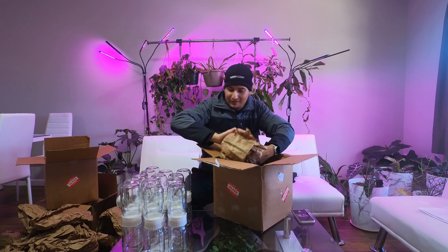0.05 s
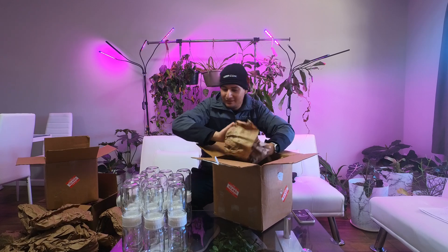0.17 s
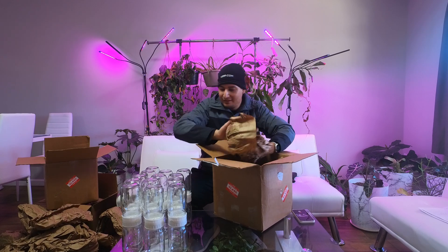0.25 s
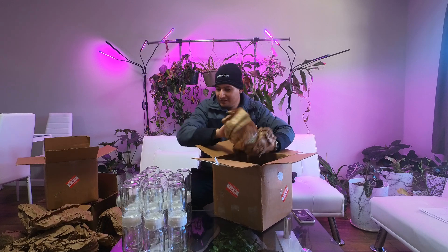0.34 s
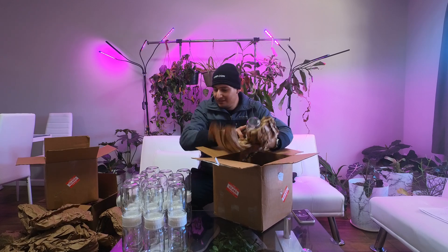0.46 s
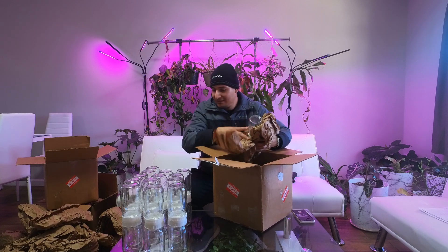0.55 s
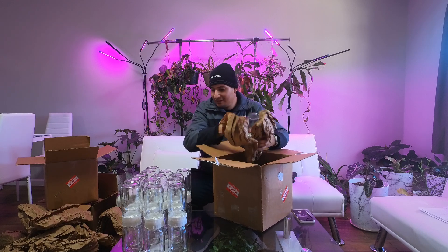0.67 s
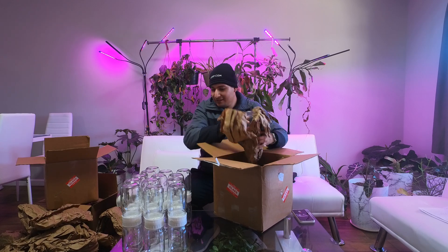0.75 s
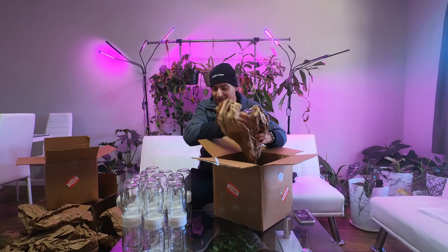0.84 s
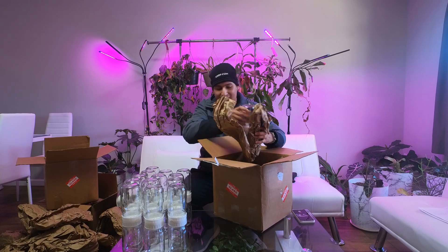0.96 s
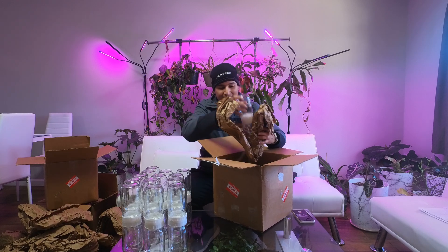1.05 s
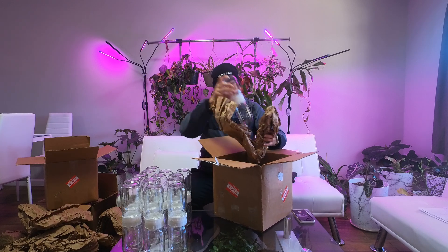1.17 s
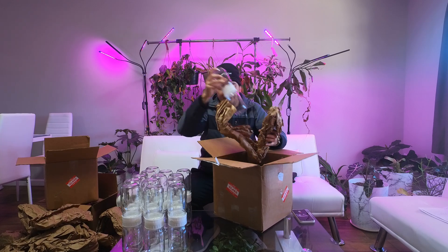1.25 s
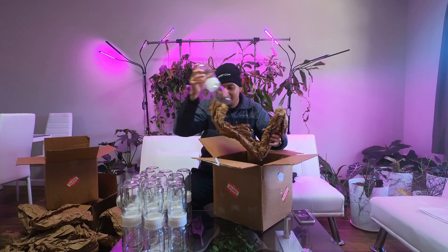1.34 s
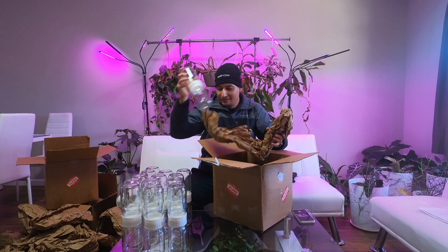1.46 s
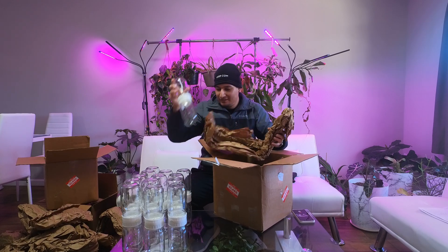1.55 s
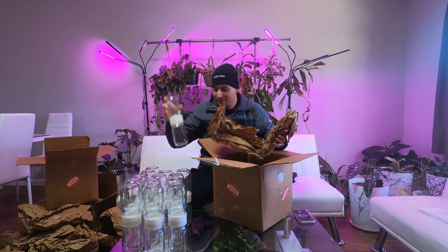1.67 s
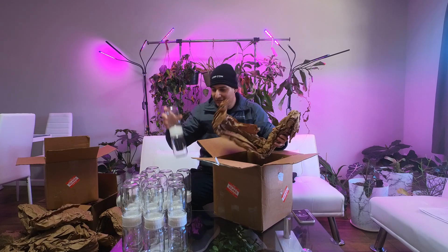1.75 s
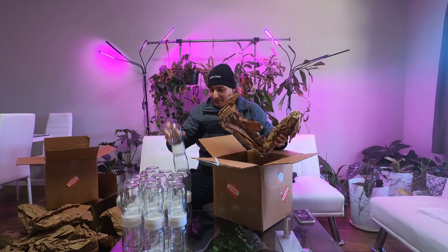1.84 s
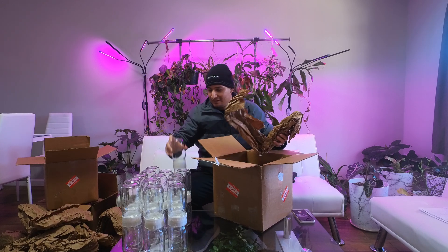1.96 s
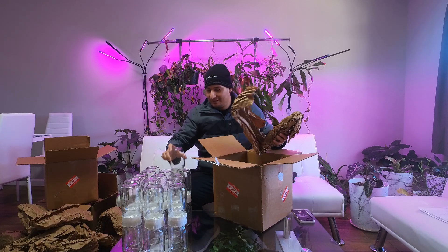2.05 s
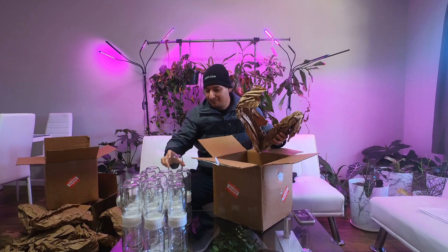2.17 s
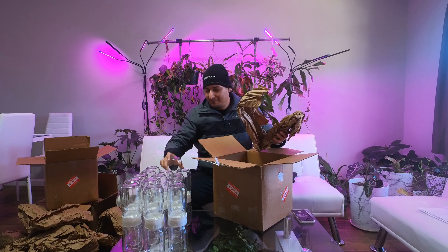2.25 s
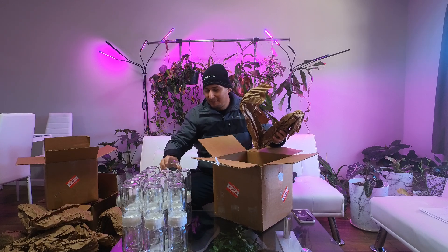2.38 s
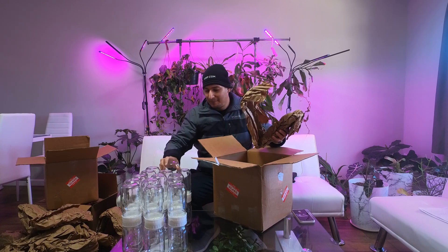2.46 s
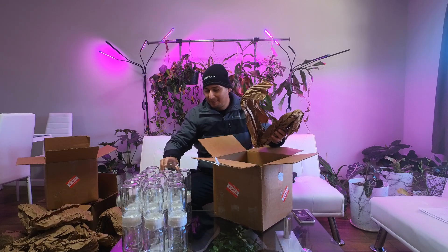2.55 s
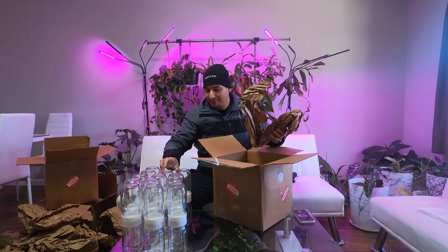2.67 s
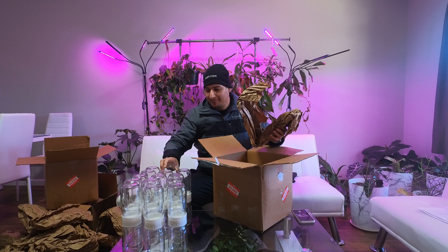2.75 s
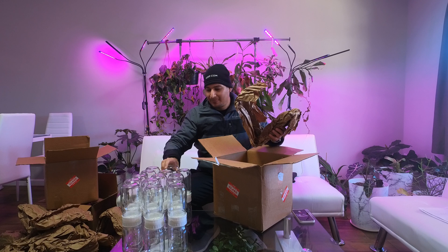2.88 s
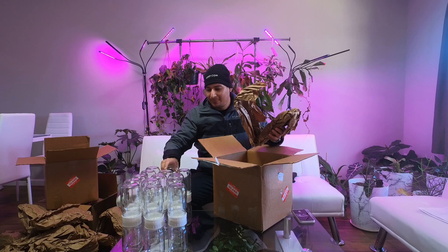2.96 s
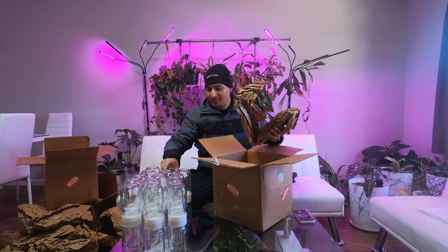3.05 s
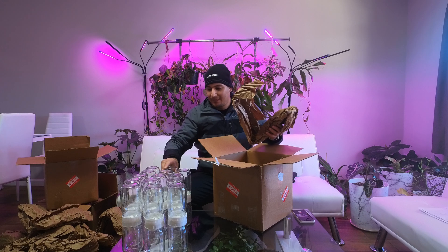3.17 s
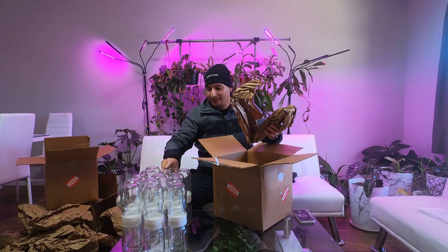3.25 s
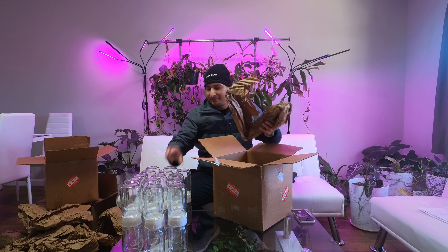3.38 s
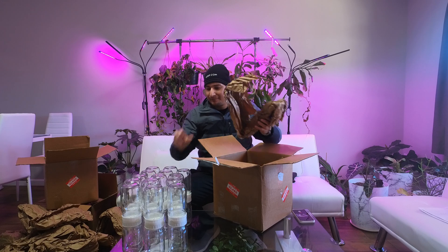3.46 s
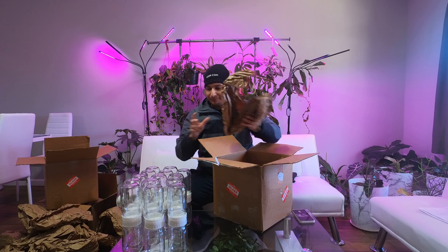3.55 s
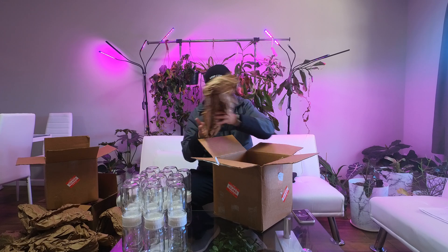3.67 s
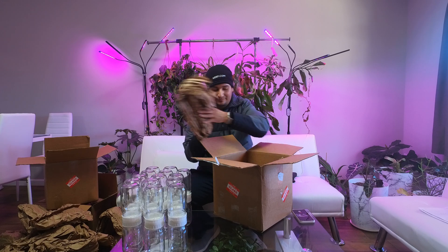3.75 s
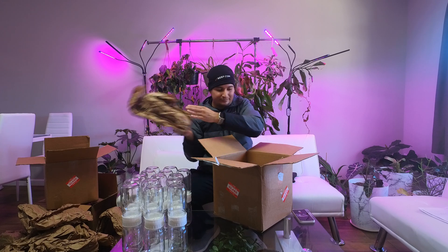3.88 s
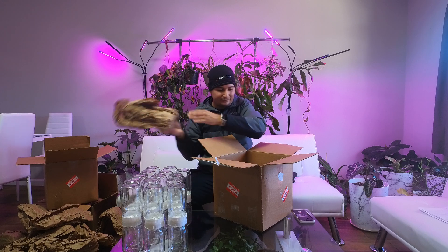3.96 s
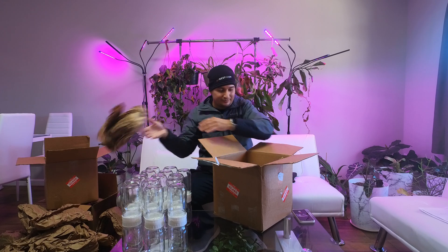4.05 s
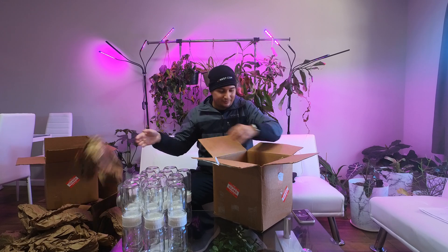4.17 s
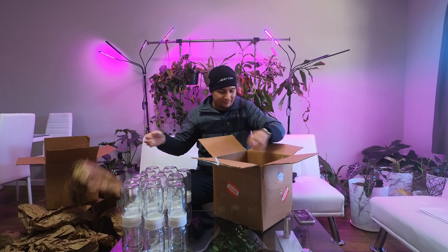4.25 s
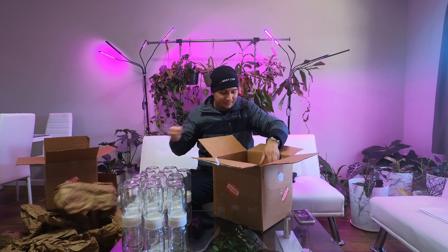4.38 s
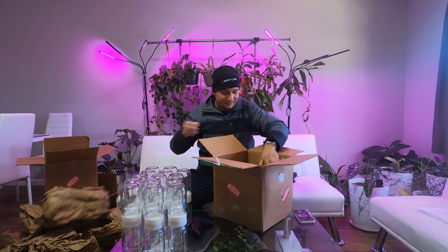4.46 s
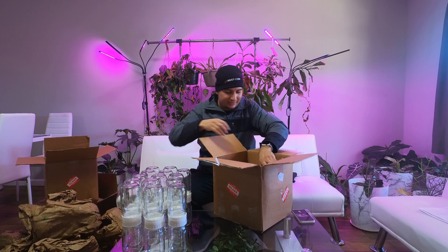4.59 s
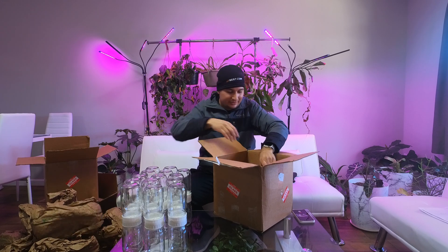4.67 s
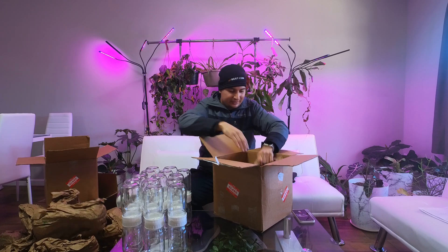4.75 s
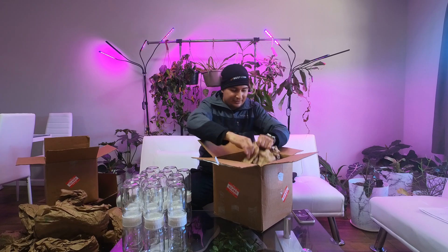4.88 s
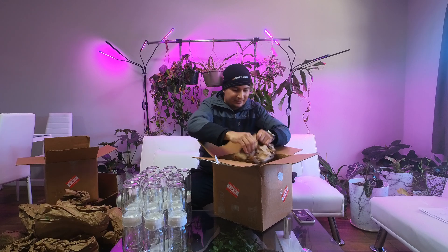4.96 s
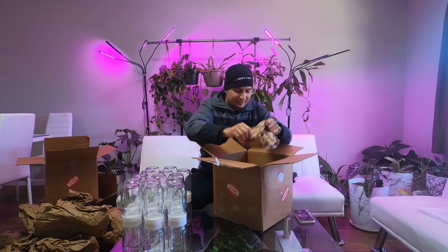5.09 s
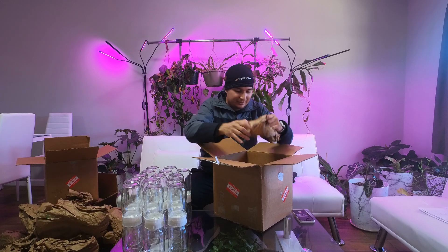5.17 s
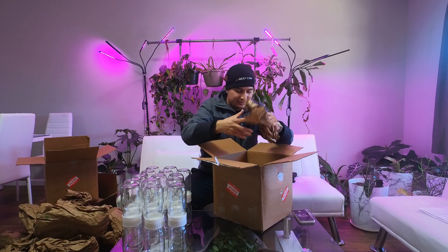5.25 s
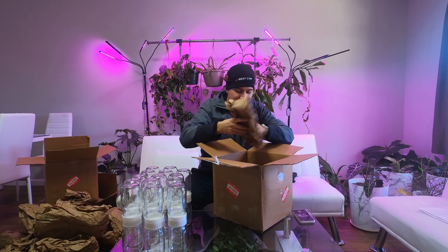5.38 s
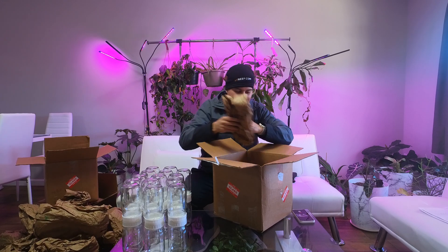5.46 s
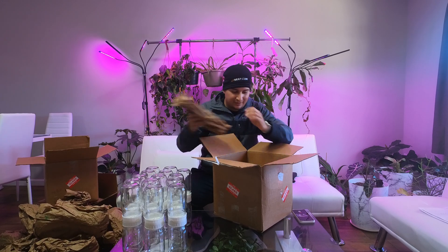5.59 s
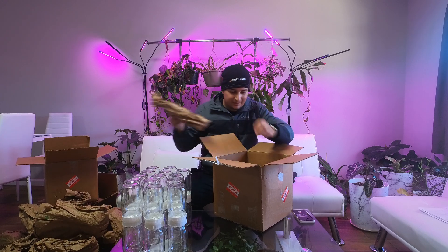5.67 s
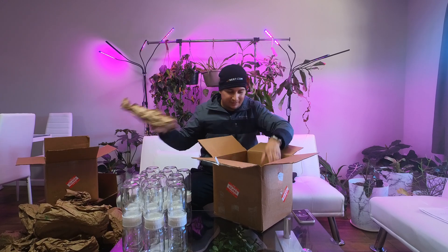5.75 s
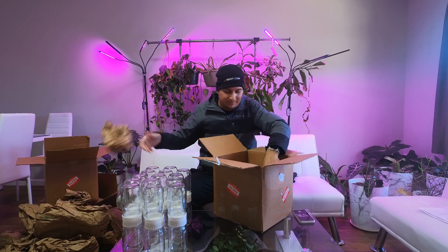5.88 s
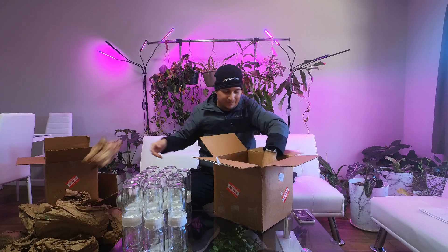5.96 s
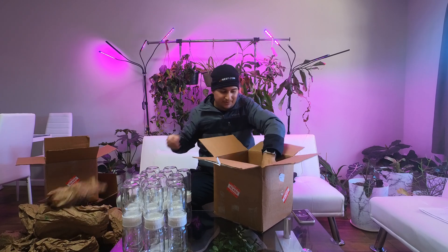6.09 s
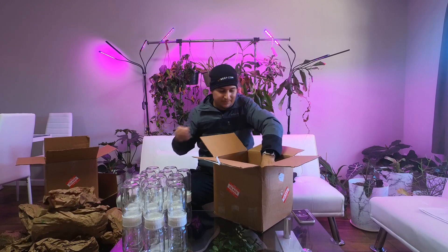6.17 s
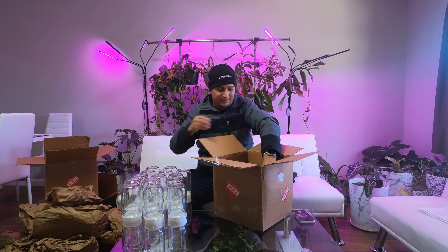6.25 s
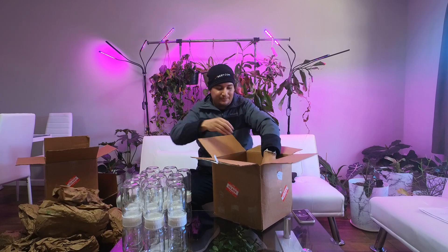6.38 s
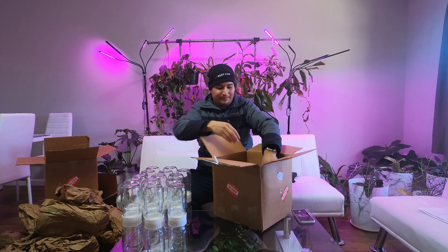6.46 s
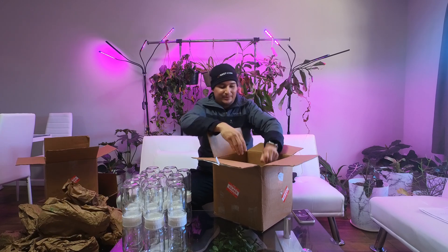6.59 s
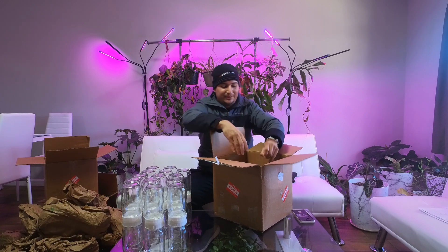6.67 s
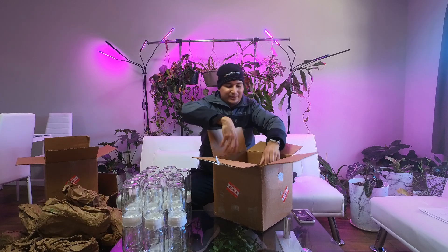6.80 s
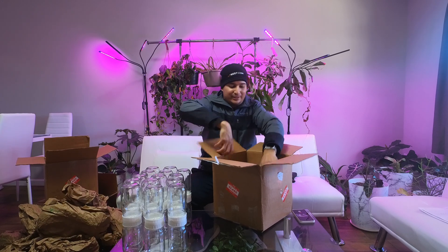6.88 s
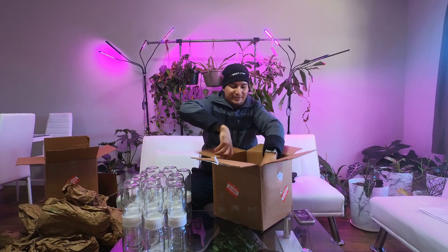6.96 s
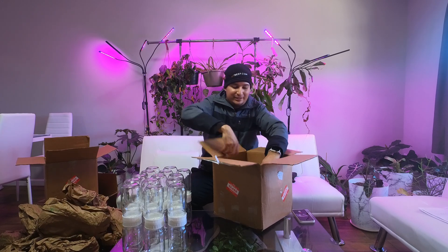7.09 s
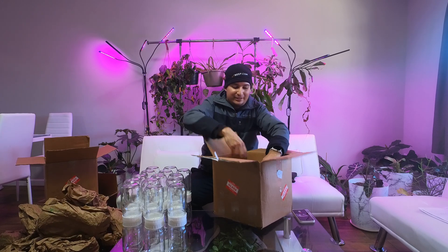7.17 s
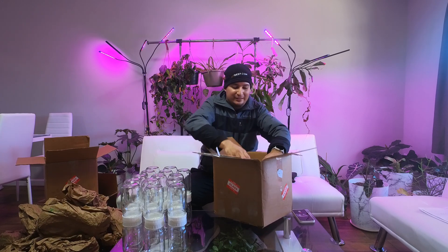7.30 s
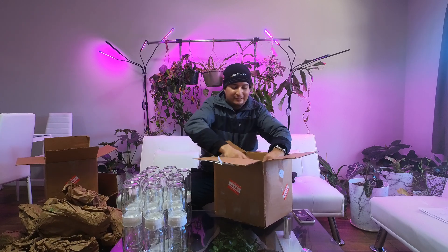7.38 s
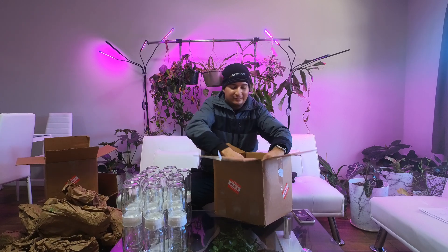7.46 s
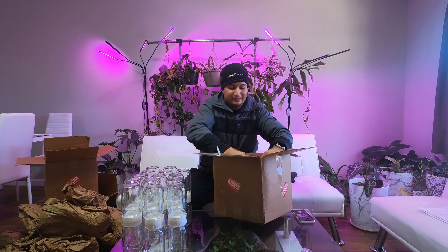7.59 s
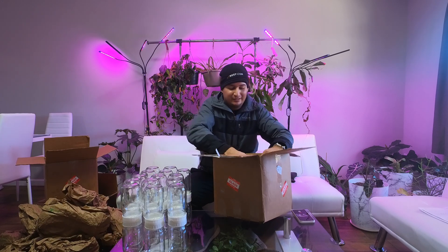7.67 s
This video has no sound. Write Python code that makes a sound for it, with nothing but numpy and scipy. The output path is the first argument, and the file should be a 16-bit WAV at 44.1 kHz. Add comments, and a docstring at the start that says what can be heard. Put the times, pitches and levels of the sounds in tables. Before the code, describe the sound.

Stereo pickup at a few metres in a hard room. Crisp paper snaps and crackles fade to near silence; a jar ticks against other glass and meets the table with a short knocking rattle. The paper is then crumpled and tossed away, and hands rummage in the box, with drier rustles, low boxy thumps, a brief flap groan and a faint low shifting rumble.

```python
"""Bare room, two microphone ports a few metres away: stiff packing paper is crumpled and pulled from a cardboard box.
Paper: swarms of random clicks through crease spectra, plus pitched bursts for large folds.
Box: low-pitched click swarms, decaying panel modes, a humming flap and swells of low rumble.
Glass: a jar touches its neighbours and is set on a glass table; noise bursts and decaying modes.
Each handled sound reaches the ports through a short wash of room echoes, over faint room tone."""
import sys
import numpy as np
from scipy import signal
from scipy.fft import rfft, irfft, next_fast_len
from scipy.io import wavfile
from scipy.ndimage import uniform_filter1d

SR = 44100
rng = np.random.default_rng(int(sys.argv[2]) if len(sys.argv) > 2 else 0)


def persist_wave(psi):
    """Save psi, clipped to +-1, as 16-bit WAV."""
    counts = np.round(np.clip(psi, -1, 1) * 32767).astype(np.int16)
    wavfile.write(sys.argv[1], SR, np.atleast_2d(counts).T)


N = 340893

# room tone spectrum, relative: freq_hz, level_db
AIR_SPECTRUM = [(20, -27.5), (50, -23), (76, -11), (145, -5), (223, -2), (330, -9), (545, -19.5),
                (1000, -26.5), (2000, -31), (5000, -41), (9500, -46.5), (12000, -33.5), (16000, -65)]
# spectrum of jar chatter, relative: freq_hz, level_db
CLINK_SPECTRUM = [(650, -63), (1100, -47), (1330, -5), (1750, 1), (2250, -7), (2600, 3), (3050, -12),
                  (3400, -11), (4630, -15), (8000, -56), (10400, -68), (17600, -120)]
# spectrum of the set-down blow, relative: freq_hz, level_db
THUD_SPECTRUM = [(35, -44), (65, -13), (110, -23), (192, -0.5), (372, -4), (640, -8), (860, -2), (1080, -7),
                 (1280, -8), (1900, -12), (2300, -7), (2800, -14), (3720, -14), (4500, -27), (6020, -46),
                 (12500, -64), (14000, -60)]
# jar modes, relative: freq_hz, level_db, t60_s
JAR_MODES = [(1750, -2, 0.1), (1790, -8, .1), (2480, -1, .07), (2630, -6, 0.17), (3320, -16, 0.06),
             (1450, -9, 0.15)]
# glass table modes, relative: freq_hz, level_db, t60_s
TABLE_MODES = [(365, -6, .25), (504, -9, .19), (845, -9, .55), (890, -9, .4), (1040, -5, .08),
               (2290, -3, .12), (3740, -10, .1)]
# jar against jar: start_s, level_db, chatter_t60_s, rise_s
TOUCHES = [(2.8206, -44.5, 0.07, 0.0001), (2.861, -52, 0.06, 0.0002), (3.316, -48, 0.4, 0.012)]
# jar meets the table and rocks flat: start_s, level_db
SET_DOWNS = [(3.039, -22.5), (3.061, -29), (3.092, -32)]
# blows on the box: start_s, level_db, pitch_hz, t60_s
KNOCKS = [(.796, -42, 324, 0.044), (1.033, -45, 302, 0.041), (3.26, -42, 387, 0.13),
          (3.32, -41.5, 405, 0.24), (3.34, -45, 493, 0.13), (3.359, -42.5, 225, 0.15),
          (3.39, -47, 439, 0.19), (4.348, -40, 387, 0.093), (4.717, -40.5, 154, 0.1),
          (5.916, -34, 289, 0.052), (5.973, -36.5, 436, 0.24), (6.49, -36, 353, 0.076),
          (6.892, -39, 232, 0.12), (6.913, -31.5, 188, .12), (6.929, -37, 188, .08),
          (7.034, -31, 300, 0.018), (7.459, -34, 233, 0.072)]
# dragging flap, a curve over time: time_s, pitch_hz, level_db
FLAP_CURVE = [(6.625, 220, -37), (6.65, 225.6, -36), (6.72, 213, -38), (6.76, 205, -52)]
# whole box shifting on the floor: middle_s, level_db, length_s
SHOVES = [(4.41, -52, 0.19), (4.744, -53, 0.2), (4.924, -52, 0.45), (6.144, -51, 0.44), (6.61, -51, .42),
          (6.944, -41.5, 0.11)]
# spectrum of box panels and enclosed air, relative: freq_hz, level_db
CARDBOARD_SPECTRUM = [(50, -13.5), (90, -8.5), (130, -5), (200, 4), (260, 2), (340, 3.5), (500, 1.5),
                      (620, -6), (850, -3.5), (1300, -19.5), (3000, -74.5)]
# spectrum of broad folds, relative: freq_hz, level_db
CREASE_SPECTRUM = [(180, -14.5), (400, -8.5), (501, 1.5), (675, -2), (1960, 5), (3010, 0.5), (3750, 1.5),
                   (5960, -12), (9000, -11.5), (11700, -63), (19800, -120)]
# spectrum of thin creases, relative: freq_hz, level_db
THIN_SPECTRUM = [(2940, -24), (5000, -4), (5960, -12), (9930, -11), (11800, 2.5), (13000, 4.5),
                 (15200, 0.5), (16000, -2)]
# single large folds: start_s, level_db, pitch_hz, treble_share_db, broad_share_db
SNAPS = [(0.068, -20.5, 3740, 0, -8), (0.386, -44, 2500, -22, -15), (0.793, -25, 2050, -7, -6),
         (0.818, -31, 2080, -20, -12), (0.855, -34, 3100, -10, 5), (1.0321, -40.5, 960, 20, 16),
         (1.6944, -41.5, 1890, -19, -17), (2.0363, -57, 2100, -4, -4), (2.1009, -56, 1700, -4, -6),
         (3.7255, -36, 3750, 7, -9), (3.7812, -52.5, 1850, 28, 22), (3.83, -34.5, 869, -5, -3),
         (3.875, -38, 735, -12, -15), (4.048, -48, 970, -8, 9), (4.348, -34.5, 1600, 13, 11),
         (4.7101, -36, 2030, 16.5, 14), (5.4348, -39, 1890, -32, -7), (5.7125, -39, 2800, 17.5, 8),
         (5.721, -46, 3000, 17, 6), (6.1662, -34.5, 2020, 15, -8), (6.4796, -37, 1810, 20, 4),
         (7.3148, -37, 1520, 8, -8)]
# grasps at the paper: full_effort_s, crumple_db, rise_db_per_s, hold_s, release_db_per_s,
# thin_above_crumple_db, cardboard_push_db
GRASPS = [(0.0, -40.5, 300, 0.16, 33, 0, -48), (0.475, -39, 46.5, 0.037, 53, -0.5, -49),
          (0.791, -45.5, 902, 0.023, 46, -2.5, -54), (1.034, -49.5, 897, 0.0093, 130, 1.5, -50.5),
          (1.123, -53.5, 90, 0.017, 50, 6.5, -72), (1.4, -59.5, 81, 0.045, 33, -13, -69),
          (1.52, -51, 90, 0.028, 79, 0, -64.5), (1.681, -52.5, 145, 0.012, 195, -1.5, -83),
          (2.04, -84, 16, 0.11, 51, 9.5, -86), (3.348, -91.5, 125.5, .02, 136, -4.5, -46),
          (3.48, -77, 183.5, 0.12, 12, 5, -74), (3.796, -46.5, 119.5, 0.068, 70.5, 1.5, -57),
          (4.024, -68.5, 49, 0.022, 139, 16, -76), (4.346, -42.5, 908, 0.009, 24.5, 1, -39.5),
          (4.72, -45.5, 74, 0.0085, 24, 2, -40.5), (4.953, -44.5, 47, 0.081, 86, 1.5, -45.5),
          (5.203, -48.5, 61, 0.1, 41, 4, -59.5), (5.433, -42, 500, 0.099, 107, 0, -51.5),
          (5.716, -60.5, 1200, 0.013, 293, -13, -83), (5.806, -60.5, 63, 0.03, 67, 2, -88),
          (5.906, -49, 307, 0.011, 56, 0.5, -46), (6.095, -85, 80, 0.027, 60, 29, -43.5),
          (6.203, -41.5, 130.5, 0.038, 73, -2, -35), (6.43, -67, 57, 0.023, 60, -7, -50),
          (6.522, -43, 63, 0.074, 107, 2, -42), (6.702, -58, 42, 0.081, 160, -51, -45),
          (6.899, -52, 888, 0.052, 35, -0.5, -42), (6.955, -50.5, 189.5, 0.089, 76, 1, -50),
          (7.222, -54.5, 54, 0.017, 57, 3.5, -50.5), (7.313, -59, 82, 0.026, 62, 6, -44),
          (7.428, -50, 42.5, 0.048, 53, 3, -42), (7.71, -46, 107, .05, 60, 1, -39.5)]
# room decay before each source's stretch factor: freq_hz, t60_s
ROOM_DECAY = [(150, 0.2), (1000, 0.79), (4000, 0.77), (14000, 0.76)]
# first reflections off floor and wall, relative to direct sound: delay_s, level_db
BOUNCES = [(.0059, -4), (.0122, -9)]
# left-right likeness of diffuse sound: freq_hz, likeness_ratio
LIKENESS = [(40, .2), (130, .97), (300, .92), (640, .8), (1400, .3), (3100, .1)]
# phase lead of the left port: freq_hz, lead_rad
LEFT_LEAD = [(100, 0.67), (340, 0.77), (860, 0.36), (1800, 0.)]
# port imbalance: freq_hz, left_minus_right_db
PORT_TILT = [(40, -3), (60, -.5), (130, 2.5), (250, -2), (380, -5), (600, -8.5), (1290, -7), (2380, -5.5),
             (4400, -4), (8000, -5), (12500, -7.5)]

AIR_DB, EDGE_HZ = -70, 15850
SAG_DB_PER_S = 10  # effort slackens while a grasp is held
THIN_HASTE, BOX_HASTE = 1.19, 1.56  # edge slopes in dB/s relative to the broad folds
SNAP_T60_S, SNAP_RISE_S = 0.022, 0.000079


def gain_of(db):
    """Decibels to amplitude gain."""
    return 10 ** (np.asarray(db) / 20)


def evened(x):
    """Scale to rms 1."""
    return x / np.sqrt(np.mean(x ** 2) + 1e-20)


def peaked(x):
    """Scale to peak 1."""
    return x / abs(x).max()


def read(points, hz):
    """Interpolate a table on a log-frequency axis."""
    freq_hz, value = np.transpose(points)
    return np.interp(np.log(hz + 1), np.log(freq_hz + 1), value)


def add(mix, start_s, sound):
    """Mix a sound in at start_s, cut at the end of the mix."""
    part = mix[round(start_s * SR):][:len(sound)]
    part += sound[:len(part)]


def bandpass(order, low_hz, high_hz, x):
    """Butterworth band-pass filter."""
    sos = signal.butter(order, [low_hz, high_hz], "band", fs=SR, output="sos")
    return signal.sosfilt(sos, x)


def highpass(order, cutoff_hz, x):
    """Butterworth high-pass filter."""
    return signal.sosfilt(signal.butter(order, cutoff_hz, "high", fs=SR, output="sos"), x)


def colour(points, size=4096):
    """Minimum-phase response with the tabled spectrum, energy 1."""
    hz = abs(np.fft.fftfreq(size, 1 / SR))
    log_gain = np.log(gain_of(np.maximum(read(points, hz), -100)))
    taps = np.fft.ifft(np.exp(np.conj(signal.hilbert(log_gain)))).real[:size // 2]
    return taps / np.linalg.norm(taps)


def swell_up(size, rise_s):
    """Exponential onset from 0 towards 1."""
    return 1 - np.exp(-np.arange(size) / (rise_s * SR))


def ring(modes, size=16000):
    """Sum of exponentially decaying sine modes."""
    t = np.arange(size) / SR
    return sum(gain_of(db - 60 * t / t60_s) * np.sin(2 * np.pi * hz * t) for hz, db, t60_s in modes)


def burst(t60_s, rise_s, size=4000):
    """Short scrape: white noise with exponential rise and decay."""
    t = np.arange(size) / SR
    return rng.standard_normal(size) * gain_of(-60 * t / t60_s) * swell_up(size, rise_s)


def swarm(per_s, spread_db, clump_db, clump_s):
    """Clumped random clicks of uneven size; rate changes leave the power alone."""
    clumps = evened(uniform_filter1d(rng.standard_normal(N), max(int(clump_s * SR), 1)))
    size = gain_of(spread_db * np.minimum(rng.exponential(1, N), 5) + clump_db * clumps)
    sign = rng.choice([-1., 1.], N)
    struck = rng.random(N) < per_s / SR
    return evened(size * sign * struck / np.sqrt(per_s))


def pair(frames, size):
    """Random spectra for two ports, alike in the bass and nearly unrelated in the treble."""
    hz = np.fft.rfftfreq(size, 1 / SR)
    a, b, c, d = rng.standard_normal((frames, len(hz), 4)).T
    same = np.clip(read(LIKENESS, hz), 0, 1)[:, None]
    right, unrelated = a + 1j * b, c + 1j * d
    left = same * right + np.sqrt(1 - same ** 2) * unrelated
    return hz, np.array([left, right])


def echoes(direct_db, stretch):
    """Path to the ports: direct sound, two reflections, then noise decaying band by band."""
    hz, z = pair(240, size=512)
    t = np.arange(z.shape[2]) * 128 / SR
    t60_s = stretch * read(ROOM_DECAY, hz)[:, None]
    tail = signal.istft(z * gain_of(-60 * t / t60_s), nperseg=512, noverlap=384)[1]
    tail = tail * swell_up(tail.shape[1], 0.0029)  # reflections build up
    tail = tail / np.linalg.norm(tail, axis=1)[:, None]
    left_delay = rng.integers(1, 6)  # samples
    tail[[0, 1], [left_delay, 0]] = gain_of(direct_db)
    for delay_s, level_db in BOUNCES:
        tail[:, round(delay_s * SR) + rng.integers(0, 12)] += gain_of(direct_db + level_db)
    return tail / np.linalg.norm(tail[0])


def heard(x, direct_db, stretch):
    """Mono sound convolved with a fresh room path to both ports."""
    return signal.oaconvolve(x[None], echoes(direct_db, stretch), axes=1)[:, :N]


def air():
    """Room tone: shaped noise with slow random level lumps across time and frequency."""
    hz, z = pair(N // 256 + 5, size=1024)
    lumps = uniform_filter1d(rng.standard_normal(z.shape[1:]), 6, 0)
    lumps = evened(uniform_filter1d(lumps, 8, 1))
    z = z * gain_of(read(AIR_SPECTRUM, hz)[:, None] + 0.65 * lumps)
    tone = signal.istft(z, nperseg=1024, noverlap=768)[1][:, :N]
    return gain_of(AIR_DB) * evened(tone)


def glass():
    """Touches chatter and ring the jar; set-downs thud, clatter and excite the table modes."""
    touches, blow, table = np.zeros((3, N))
    for start_s, level_db, t60_s, rise_s in TOUCHES:
        chatter = signal.oaconvolve(burst(t60_s, rise_s, size=8000), colour(CLINK_SPECTRUM))
        add(touches, start_s, gain_of(level_db) * peaked(chatter))
        jar = peaked(ring(JAR_MODES)) * swell_up(16000, rise_s)
        add(touches, start_s, gain_of(level_db - 2.5) * jar)
    for start_s, level_db in SET_DOWNS:
        thud = signal.oaconvolve(burst(0.23, 0.00069, size=12000), colour(THUD_SPECTRUM))
        add(blow, start_s + 0.00132, gain_of(level_db) * peaked(thud))
        clatter = signal.oaconvolve(burst(0.072, 0.0022, size=12000), colour(THIN_SPECTRUM))
        add(blow, start_s + 0.00055, gain_of(level_db - 31.0) * peaked(clatter))
        ringing = signal.oaconvolve(burst(0.008, 0.00055), ring(TABLE_MODES, size=24000))
        add(table, start_s + 0.00117, gain_of(level_db - 8.5) * peaked(ringing))
    return heard(touches, 2.5, 0.47) + heard(blow, 0.8, 0.78) + heard(table, 1.5, 0.85)


def knocks():
    """Dull blows: a soft push excites two decaying panel modes."""
    out = np.zeros(N)
    for start_s, level_db, hz, t60_s in KNOCKS:
        panel = ring([(hz, 0, max(t60_s, .02)), (1.2 * hz, -9., .04)], size=9000)
        panel = panel * swell_up(9000, 0.0013)  # the panel takes a moment to swing up
        palm = signal.windows.hann(max(round(.6 * SR / hz), 3))  # push lasts about half a swing
        add(out, start_s, gain_of(level_db) * peaked(signal.oaconvolve(palm, panel)))
    return out


def flap():
    """Dragging flap: a gliding sine with uneven grip."""
    out = np.zeros(N)
    time_s, pitch_hz, level_db = np.transpose(FLAP_CURVE)
    t = np.arange(time_s[0], time_s[-1], 1 / SR)
    phase = 2 * np.pi * np.cumsum(np.interp(t, time_s, pitch_hz)) / SR
    hum = np.sin(phase) * gain_of(np.interp(t, time_s, level_db))
    hum *= 1 + 0.13 * evened(uniform_filter1d(rng.standard_normal(len(t)), 300))  # uneven grip
    add(out, time_s[0], hum * signal.windows.tukey(len(t), .3))
    return out


def shoves():
    """Box shifting on the floor: swells of narrow-band low noise."""
    out = np.zeros(N)
    rumble = evened(bandpass(4, 92., 135., rng.standard_normal(N)))
    for middle_s, level_db, length_s in SHOVES:
        swell = signal.windows.hann(round(length_s * SR))
        stretch = rumble[round(middle_s * SR):][:len(swell)]
        add(out, middle_s - length_s / 2, gain_of(level_db) * swell * stretch)
    return out


def box():
    """Panel blows, flap hum and floor rumble share one room path."""
    return heard(highpass(4, 90., knocks() + flap() + shoves()), 4., .3)


def snaps():
    """A large fold gives way in a quick burst of cracks, pitched by its size."""
    out = np.zeros((2, N))
    for start_s, level_db, hz, treble_db, broad_db in SNAPS:
        cracks = burst(SNAP_T60_S, SNAP_RISE_S, size=5000)
        cracks[0] = gain_of(18.5)  # the first crack is the hardest
        fold = bandpass(1, hz * 0.93, hz, cracks)
        sheet = signal.oaconvolve(cracks, colour(CREASE_SPECTRUM))[:len(cracks)]
        tip = signal.oaconvolve(cracks, colour(THIN_SPECTRUM))[:len(cracks)]
        snap = peaked(fold) + gain_of(broad_db) * peaked(sheet) + gain_of(treble_db) * peaked(tip)
        snap = gain_of(level_db) * snap
        add(out.T, start_s, signal.oaconvolve(snap[None], echoes(-4.5, 0.39), axes=1).T)
    return out


def controls():
    """Gains of broad folds, thin creases and cardboard: each grasp rises, sags, lets go."""
    t = np.arange(0, N / SR + .01, .002)
    power = 0
    for full_s, crumple_db, rise_db_per_s, hold_s, release_db_per_s, thin_db, push_db in GRASPS:
        rise_db = rise_db_per_s * np.maximum(full_s - t, 0)
        release_db = release_db_per_s * np.maximum(t - full_s - hold_s, 0)
        edges_db = rise_db + release_db
        sag_db = SAG_DB_PER_S * np.clip(t - full_s, 0, hold_s)
        power += gain_of([crumple_db - sag_db - edges_db,
                          crumple_db + thin_db - sag_db - THIN_HASTE * edges_db,
                          push_db - sag_db - BOX_HASTE * edges_db]) ** 2
    return [np.interp(np.arange(N) / SR, t, np.sqrt(p)) for p in power]


def handling():
    """Click swarms from six spots of the sheet and box, each with its own room paths."""
    crumple, thin, push = controls()
    busy = np.clip((crumple / gain_of(-60.0)) ** 0.36, .12, 1)  # an idle sheet ticks sparsely
    out = np.zeros((2, N))
    for spot in range(6):
        fold_clicks = swarm(260 * busy, 3.2, 3.2, .045)
        folds = crumple * signal.oaconvolve(fold_clicks, colour(CREASE_SPECTRUM))[:N]
        size_hz = 660.0 * 1.499 ** spot  # folds of one size ring near one pitch
        folds = folds + gain_of(3.) * bandpass(1, size_hz * 0.8, size_hz, folds)
        thin_clicks = swarm(1000 * busy, 2.5, 6.4, 0.056)
        crackle = thin * signal.oaconvolve(thin_clicks, colour(THIN_SPECTRUM))[:N]
        box_clicks = swarm(400, 2.8, 2.5, 0.03)
        boom = push * signal.oaconvolve(box_clicks, colour(CARDBOARD_SPECTRUM))[:N]
        out += heard(folds + crackle, -7.0, 0.29)
        out += heard(boom, -14.5, 0.3)
    return out / np.sqrt(6)  # the spots share the power


def scene():
    """Room tone, glass, box and paper."""
    return air() + glass() + box() + snaps() + handling()


def record(dry):
    """Ports differ in colour and phase and shed deep bass; a low-pass limits the band."""
    size = next_fast_len(N + SR)
    hz = np.fft.rfftfreq(size, 1 / SR)
    half_db = read(PORT_TILT, hz) / 2
    lead_rad = np.outer([1, 0], read(LEFT_LEAD, hz))
    response = gain_of([half_db, -half_db]) * np.exp(1j * lead_rad)
    ports = irfft(rfft(dry, size) * response, size)[:, :N]
    ports = highpass(1, 80., ports)
    lowpass = signal.firwin(801, EDGE_HZ, window=("kaiser", 10), fs=SR)
    return signal.oaconvolve(ports, lowpass[None], "same")


dry = scene()
out = record(dry)
persist_wave(out)
```